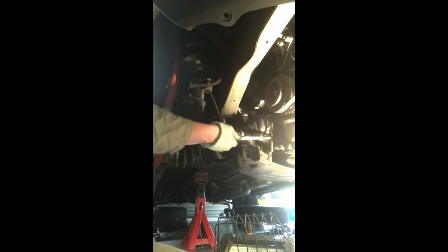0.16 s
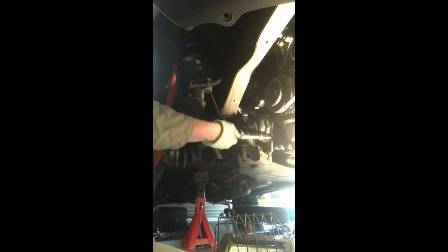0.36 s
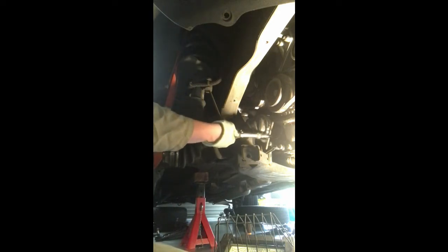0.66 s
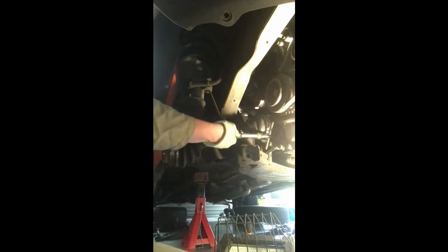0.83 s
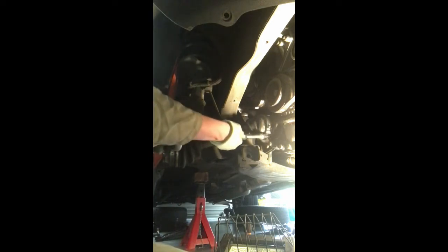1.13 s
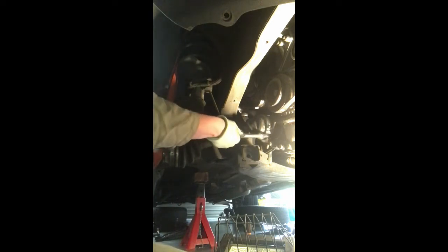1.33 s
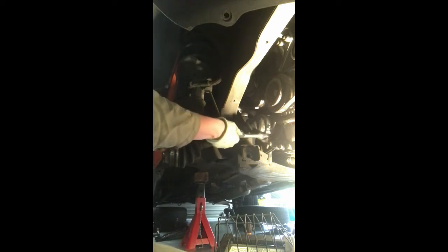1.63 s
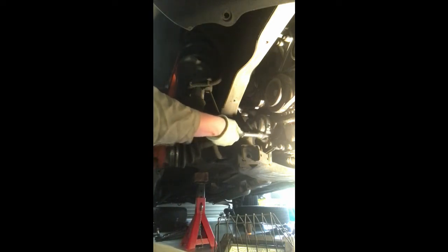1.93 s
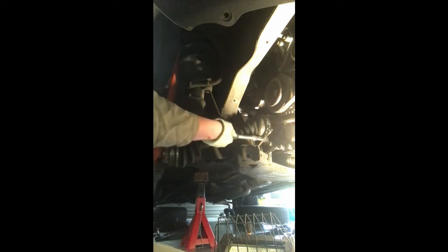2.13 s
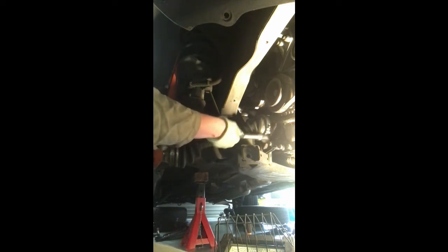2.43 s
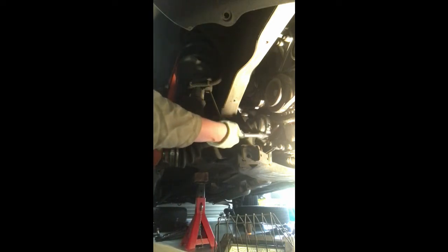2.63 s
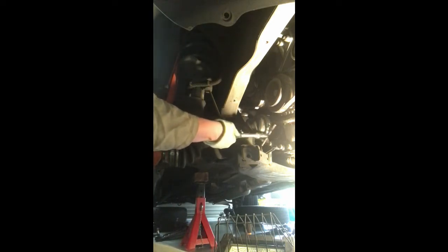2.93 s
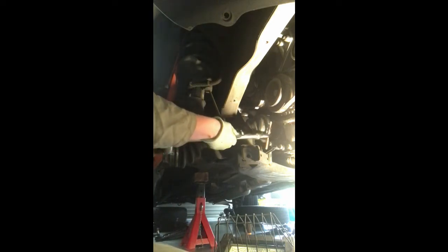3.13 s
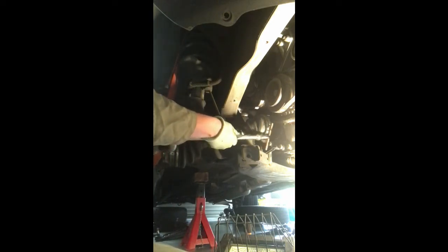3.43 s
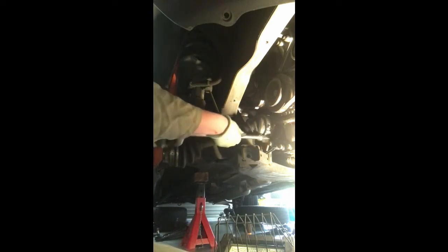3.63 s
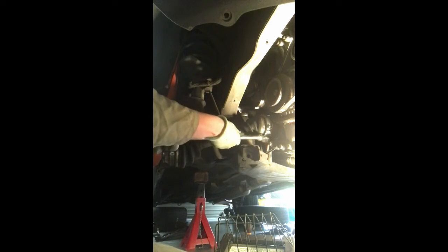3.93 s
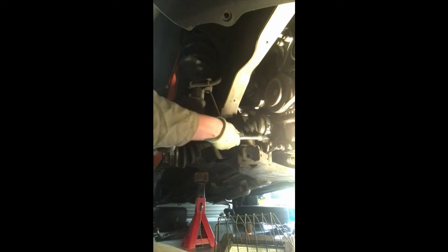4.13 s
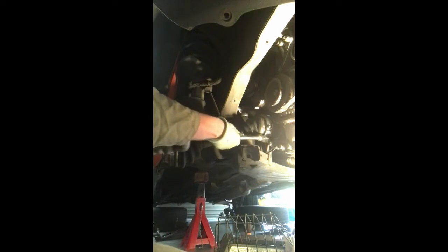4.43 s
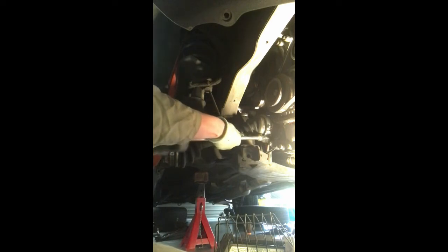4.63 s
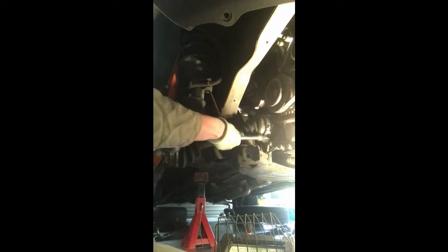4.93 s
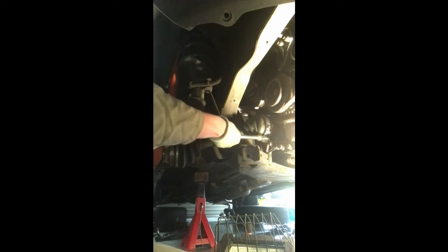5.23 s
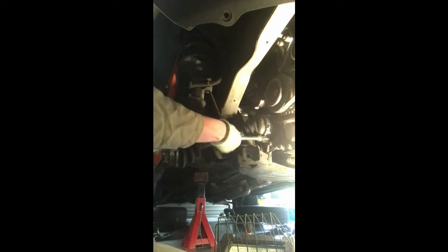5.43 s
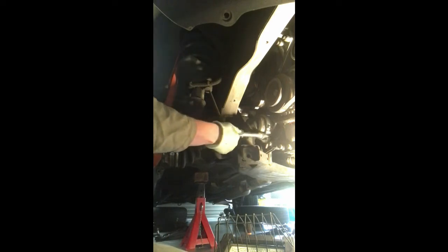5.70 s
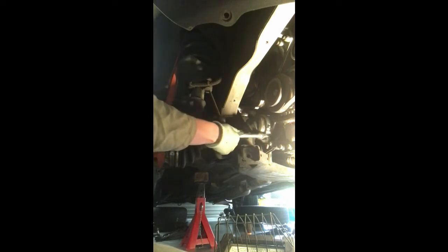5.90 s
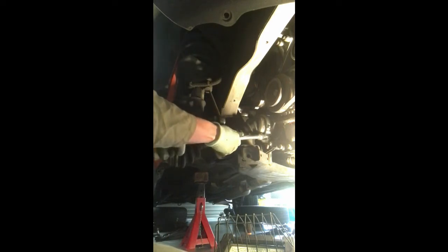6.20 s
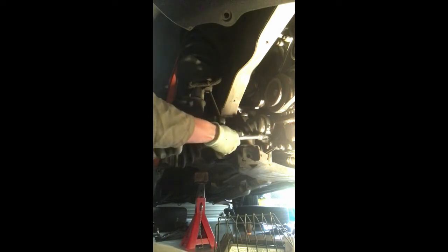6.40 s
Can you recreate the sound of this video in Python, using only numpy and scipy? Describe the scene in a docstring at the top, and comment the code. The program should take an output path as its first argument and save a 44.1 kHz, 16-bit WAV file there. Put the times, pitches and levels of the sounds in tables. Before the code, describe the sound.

Close to a raised car in a quiet garage, a steel weight slides on a shaft and strikes its stop. Uneven clanks, each a brief chatter of contacts with a bright, beating ring, come every half second or so. Short gritty scrapes lead into the blows; light rattles and dull low knocks of the car body follow. The hardest clacks land near two, and around five seconds. Low hum and soft hiss stay underneath.

```python
"""The low hum of a garage, at once a brief scrape and a clank: a steel weight slides along a shaft
under a car and hits its stop. Each blow is a burst of noisy touches that rings the shaft and the car.
The weight sings in pairs of close tones, and dull knocks are low swinging tones with a short rumble.
Between blows, gritty noise makes the scrape and slowly drifting noise makes the hum and hiss."""
import sys
import numpy as np
from scipy import signal
from scipy.fft import rfft, irfft
from scipy.io import wavfile
from scipy.ndimage import uniform_filter1d

SR = 44100
rng = np.random.default_rng(int(sys.argv[2]) if len(sys.argv) > 2 else 0)


def master_out(mix):
    """Clip the mix to full scale and print it as 16-bit PCM to the path in sys.argv[1]."""
    frames = np.transpose(np.atleast_2d(mix))
    ceiling = np.clip(frames, -1, 1)
    pcm = np.round(ceiling * 32767).astype(np.int16)
    wavfile.write(sys.argv[1], SR, pcm)


N = 289296
RING_SAMPLES = 1 << 15  # room for one blow and its ringing

# Blows and rattles, levels relative to each other:
# (time [s], level under 5.5 kHz [dB], level over 5.5 kHz [dB], chatter [s])
BLOW_EVENTS = [(0.0764, -35, -41.5, 0.0089), (0.1099, -36, -48, 0.04), (0.1257, -27.5, -26.5, 0.016),
               (0.4392, -40, -46.5, 0.017), (0.4977, -43.5, -48, 0.027), (0.6478, -46.5, -63, 0.019),
               (0.667, -35.5, -44, 0.0068), (1.0616, -27.5, -33, 0.012), (1.0802, -27, -26, 0.022),
               (1.2974, -31, -37.5, 0.011), (1.688, -33.5, -32.5, 0.0082), (1.959, -60, -68, 0.019),
               (2.0205, -35.5, -41.5, 0.045), (2.0587, -17.5, -12, 0.0077), (2.1276, -43, -33, 0.017),
               (2.438, -56.5, -54, 0.013), (2.4676, -24.5, -21.5, 0.013), (2.486, -29.5, -31.5, 0.0089),
               (2.6622, -44, -64, 0.01), (2.6743, -43, -50, 0.014), (2.9147, -55.5, -74, 0.01),
               (2.964, -60, -72, 0.0034), (3.1595, -61, -80, 0.013), (3.229, -54.5, -86.5, 0.0058),
               (3.2712, -51, -84, 0.003), (3.5166, -46, -54, 0.011), (3.546, -57, -62, 0.0017),
               (3.613, -27.5, -40.5, 0.013), (3.6339, -24, -25.5, 0.01), (3.656, -31.5, -30.5, 0.005),
               (3.7715, -32.5, -33.5, 0.016), (4.0382, -55.5, -78, 0.0051), (4.3689, -46, -55, 0.013),
               (4.3981, -42.5, -51.5, 0.011), (4.4375, -32.5, -36.5, 0.0065), (4.4653, -32, -37, 0.0036),
               (4.5299, -48.5, -56.5, 0.0011), (4.6233, -48.5, -64, 0.0047), (4.6752, -45, -62, 0.068),
               (4.7178, -19, -13, 0.0045), (4.7261, -22.5, -17.5, 0.0043), (5.0365, -31, -43.5, 0.019),
               (5.0513, -41, -47, 0.0073), (5.0717, -33.5, -37, 0.01), (5.1364, -36, -45, 0.0052),
               (5.1936, -34, -38.5, 0.032), (5.2204, -15, -11, 0.0023), (5.2257, -20, -16, 0.0082),
               (5.4969, -41, -49.5, 0.015), (5.5739, -46, -55.5, 0.0051), (5.6318, -39, -54.5, 0.011),
               (5.7732, -51, -67, 0.013), (5.9693, -60, -77.5, 0.013), (6.045, -53.5, -86, 0.0059),
               (6.105, -45.5, -64, 0.01)]
# Bare contact of steel on steel: (frequency [Hz], relative level per Hz [dB])
CONTACT_COLOUR = [(88, -38.5), (150, -4.5), (317, -15), (1330, -9.5), (1690, -1.5), (2310, 1), (2810, 3),
                  (3700, 6.5), (4000, 4), (5700, -4.5), (6050, -1), (8130, -5), (10300, -6), (15300, -11),
                  (16500, -27.5)]
# Resonances of shaft, stop and brackets: (frequency [Hz], width [Hz], level over the bare contact [dB])
SHAFT_RESONANCES = [(631, 68, 15), (1244, 610, 9.5), (1710, 20, -3), (2030, 77, -3.5), (2930, 190, 0.5),
                    (3416, 250, -6), (3946, 91, 1), (4050, 52, 13), (4470, 17, -8.5), (5265, 93, 12.5),
                    (6210, 32, 11.5), (6678, 77, 13.5), (7460, 29, 8.5), (7720, 91, 10.5), (8166, 50, 14),
                    (9283, 110, 8.5), (10300, 24, -1.5), (11520, 120, 11), (13930, 120, 15),
                    (15550, 150, 7)]
# Dense ringing of the car's underside and the garage:
# (band centre [Hz], relative level [dB], time to fall by 60 dB [s])
CAR_BANDS = [(250, -8.5, 0.54), (596, -19, 0.63), (1300, -18, 0.41), (2560, -18, 0.49), (4150, -22, 0.46),
             (7060, -15.5, 0.43), (10500, -17.5, 0.23), (14000, -16, 0.24)]
# The weight starts to ring, mostly at a blow; where it is touched favours one tone:
# (time [s], time until the fade changes [s], level [dB], favoured tone [Hz], fall away from it [dB per octave])
WEIGHT_RINGS = [(0.0777, 0.044, -51.5, 6154, 4), (0.1261, 0.15, -26, 10160, 44),
                (0.4993, 0.08, -49, 11000, 40), (0.6674, 0.073, -56.5, 10400, 20),
                (1.062, 0.2, -39, 6154, 7), (1.085, 0.068, -41, 13515, 5), (1.2985, 0.053, -48, 7300, 29),
                (1.6886, 0.032, -44, 8820, 28.5), (2.0592, 0.039, -36.5, 9590, 41.5),
                (2.128, 0.052, -33.5, 9392, 68), (2.27, 0.058, -37.5, 9392, 75),
                (2.4688, 0.074, -31, 6154, 1), (2.6743, 0.12, -51, 9300, 25),
                (3.6351, 0.25, -31.5, 12200, 1), (3.7728, 0.055, -32.5, 6154, 27.5),
                (3.96, 0.071, -67, 6154, 60), (4.3695, 0.08, -51, 6170, 35),
                (4.4657, 0.087, -54, 12278, 61), (4.7182, 0.03, -45.5, 12278, 17),
                (5.04, 0.07, -49, 6154, 91.5), (5.0714, 0.08, -49, 12278, 61.5),
                (5.1362, 0.06, -54, 7465, 40), (5.194, 0.03, -46, 6154, 60), (5.2205, 0.043, -30, 6200, 18),
                (5.369, 0.14, -46.5, 9392, 80), (5.4979, 0.12, -47.5, 6154, 90)]
# Clear tones of the weight, each with a close twin that makes it beat: (tone [Hz], twin [Hz])
WEIGHT_TONES = [(6154, 6190), (7465, 7440), (9392, 9414), (12278, 12265), (13515, 13550), (14818, 14800)]
# How each tone fades, times are to fall by 60 dB:
# (twin against tone [dB], first fade [s], later fade [s], extra fade of the twin against the tone [s])
WEIGHT_FADES = [(-13, 0.67, 0.19, .3), (-7, 0.36, .2, .3), (-7.5, 0.3, 0.71, .5), (-15.5, 0.37, .3, .3),
                (-5.5, .3, .15, .5), (-10, .6, .25, .3)]
# How readily each tone sings: (relative level [dB])
TONE_LEVELS = [1.37, 0, -0.66, 0.2, -4.5, -4.5]
# Dull knocks of the car body and its brackets: (time [s], level [dB], pitch [Hz])
KNOCKS = [(0.078, -40.5, 599), (0.128, -39.5, 270), (1.067, -35, 665), (1.301, -39, 259), (1.691, -49, 194),
          (2.06, -30.5, 267), (2.127, -32, 218), (2.159, -42, 349), (2.486, -46, 612), (3.615, -32, 611),
          (3.639, -36.5, 588), (3.679, -37.5, 142), (3.774, -39.5, 257), (4.442, -51, 610),
          (4.718, -32.5, 228), (4.733, -35, 336), (5.041, -44.5, 622), (5.223, -37, 770),
          (5.228, -27, 262.5), (5.288, -39, 393), (5.634, -44, 173), (5.66, -42.5, 211.3),
          (5.698, -45.5, 174)]
# The weight dragging along the shaft, levels relative to each other:
# (start [s], end [s], level at start [dB], level at end [dB], treble over 6 kHz against it [dB])
DRAGS = [(.066, .077, -63, -50, -6), (1.28, 1.297, -57, -48, 1), (2.1, 2.2, -43.5, -56.5, -3),
         (0.411, 0.431, -59.5, -44, -3.5), (0.468, 0.548, -47, -59, -6), (1.02, 1.057, -50, -45.5, -7),
         (1.572, 1.685, -57.5, -52, -11), (1.966, 2.025, -50.5, -50.5, -27), (2.03, 2.059, -51, -35, 2),
         (2.278, 2.44, -50, -59, 0), (2.442, 2.464, -39, -48.5, -6), (3.529, 3.568, -53, -55, -8),
         (3.573, 3.61, -53.5, -45.5, 0.5), (4.292, 4.427, -59.5, -45, -10.5), (4.467, 4.59, -54, -59, -17),
         (4.604, 4.727, -74, -41, -1), (4.907, 5.024, -52.5, -40, -5.5), (5.09, 5.2, -68, -49, -6),
         (5.52, 5.62, -57, -59.5, 2.5), (5.663, 5.829, -63, -58.5, -12)]
# Colour of rubbing steel: (frequency [Hz], relative level per Hz [dB])
RUB_COLOUR = [(290, -55), (500, -18.5), (1540, -0.5), (2570, 1), (3990, -0.5), (4420, -13), (6760, -14),
              (9740, -18), (10500, -26.5), (15300, -26), (16500, -55.5)]
# Colour of the quiet garage: (frequency [Hz], relative level per Hz [dB])
GARAGE_COLOUR = [(15, -65), (25, -1), (138, -2), (177, -10.5), (214, -3.5), (313, -11.5), (445, -17),
                 (524, -16.5), (787, -21), (1150, -23), (1280, -23.5), (3410, -29), (9080, -37),
                 (13600, -37.5), (16500, -43.5)]
# Treble hiss over its usual level: (time [s], relative level [dB])
HISS_SWELL = [(0, -1), (1.5, 3.5), (2.85, -4.8), (3.0, 7.5), (3.17, 4), (3.25, 0.3), (6.56, -0.6)]


def blows(spread_db=2.0, dulling=0.91, jamming=0.27, crack_s=0.028, crack_db=-5, level_db=-2.0):
    """A short chatter of contacts drives the crack, the resonances and the dense ringing of the car."""
    t, hz = np.arange(RING_SAMPLES) / SR, np.fft.rfftfreq(RING_SAMPLES, 1 / SR)
    out, bands = np.zeros(N), car_noise()
    treble = 1 / (1 + (5500 / (hz + 1)) ** 6)
    end_fade = np.minimum((RING_SAMPLES / SR - t) / .2, 1)
    for s, low_db, treble_db, chatter_s in BLOW_EVENTS:
        contacts = chatter(t, chatter_s)
        hardness_db = max(treble_db + 25.5, 0)
        car = car_ringing(bands, t, low_db - treble_db, hardness_db)
        # first reflections off the underside
        crack = amp(crack_db) * rng.standard_normal(RING_SAMPLES) * dying(crack_s, t)
        # a hard blow jams the weight against the stop and smothers the shaft's resonances
        place_db = spread_db * rng.standard_normal((len(SHAFT_RESONANCES), 1)) - jamming * hardness_db
        colour_db = read(CONTACT_COLOUR, hz) + resonances(hz, place_db)
        # soft touches lack the top
        colour_db += dulling * (treble_db - low_db) * np.log2(1 + (hz / 9000) ** 4) / 4
        clank = rfft(contacts) * rfft(crack + car) * causal(colour_db)
        for share, db in ((1 - treble, low_db), (treble, treble_db)):
            part = irfft(clank * share, RING_SAMPLES)
            # level is set by the loudest 200 samples near the start
            loudest = np.sqrt(uniform_filter1d(part[:1300] ** 2, size=200).max())
            add(out, s, amp(level_db + db) * part / loudest * end_fade)
    return out


def chatter(t, chatter_s, first_db=-3, uneven_db=3.3):
    """Steel bouncing on steel: a burst of uneven touches, strongest at its start."""
    burst = np.exp(-(t / np.clip(chatter_s, .0005, .06)) ** 3)
    burst *= 1 + 0.38 * np.exp(-t / 0.00078)
    contacts = rng.standard_normal(len(t)) * burst
    contacts *= amp(uneven_db * rng.standard_normal(len(t)))
    contacts /= np.linalg.norm(contacts)
    # a clean blow starts with its hardest touch
    contacts[0] += amp(first_db) * np.exp(-chatter_s / 0.005)
    return contacts


def car_ringing(bands, t, dull_db, hardness_db, car_db=-7.5, per_dull_db=0.13, clatter=0.3):
    """The shaken car rings on in many bands; a dull blow passes more of itself to the car."""
    start = rng.integers(0, N - RING_SAMPLES)
    fade = dying(np.transpose(CAR_BANDS)[2], t) * (1 - np.exp(-t / 0.00054))
    # only the hardest blows shake the small bright parts of the car
    bright_db = clatter * hardness_db * np.linspace(0, 1, len(CAR_BANDS)) ** 3
    shaken = amp(car_db + per_dull_db * min(dull_db, 16) + bright_db)
    return shaken @ (bands[:, start:start + RING_SAMPLES] * fade)


def car_noise():
    """Noise split into the bands of the car's ringing, each at its own level."""
    hz = np.fft.rfftfreq(N, 1 / SR)
    centre, db, _ = np.transpose(CAR_BANDS)
    spectrum = rfft(rng.standard_normal(N))
    bands = []
    for level_db, one in zip(db, np.eye(len(CAR_BANDS))):
        share = np.interp(np.log(hz + 1), np.log(centre), one) ** .5
        bands.append(amp(level_db) * irfft(spectrum * share, N))
    return np.array(bands)


def resonances(hz, place_db):
    """Lift [dB] of the shaft's resonances, each raised or lowered by where the contact lands."""
    f, width, db = np.transpose(SHAFT_RESONANCES)[..., None]
    peaks = amp(db + place_db) / np.hypot(1, 2 * (hz - f) / width) ** 2
    return 20 * np.log10(1 + peaks.sum(0))


def weight(rise_s=0.0027, ping_s=.11, ping_hz=1168, ping_db=-44.5, ping_t60_s=0.53):
    """The steel weight sings in beating pairs until their fading changes, for most tones to a quicker one."""
    t, out = np.arange(SR) / SR, np.zeros(N)
    f, twin = np.transpose(WEIGHT_TONES)[..., None]
    twin_db, _, _, _ = np.transpose(WEIGHT_FADES)[..., None]
    _, first_fade, later_fade, twin_fade = np.transpose(WEIGHT_FADES)
    for s, change_s, db, best_hz, fall_db in WEIGHT_RINGS:
        tones_db = db + np.array(TONE_LEVELS) - abs(fall_db * np.log2(f[:, 0] / best_hz))
        a, b = 2 * np.pi * rng.random((2, len(WEIGHT_FADES), 1))  # starting phases
        tones = np.sin(2 * np.pi * f * t + a)
        tones += amp(twin_db) * dying(twin_fade, t) * np.sin(2 * np.pi * twin * t + b)
        fade = dying(first_fade, np.minimum(t, change_s))
        fade *= dying(later_fade, np.maximum(t - change_s, 0))
        add(out, s, amp(tones_db) @ (tones * fade) * (1 - np.exp(-t / rise_s)))
    # one bracket sings along
    ping = amp(ping_db) * dying(ping_t60_s, t) * np.sin(2 * np.pi * ping_hz * t)
    add(out, ping_s, ping)
    return out


def thuds(t60_s=0.1, rumble_db=-4):
    """A soft low swing of the car body with a short rumble of panels behind it."""
    t, out = np.arange(SR // 2) / SR, np.zeros(N)
    for s, db, hz in KNOCKS:
        band = signal.butter(1, [0.71 * hz, 1.54 * hz], "band", fs=SR)
        panels = signal.lfilter(*band, rng.standard_normal(len(t)))
        swing = np.sin(2 * np.pi * hz * t) * dying(t60_s, t)
        rumble = amp(rumble_db) * evened(panels) * dying(2.3 * t60_s, t)
        add(out, s, amp(db) * (swing + rumble) * (1 - np.exp(-t / 0.0051)))
    return out


def scrape(edge_s=0.013, grit_db=2.0, ring_db=-3, level_db=-4):
    """Rubbing steel: gritty noise, lifted at the resonances of the shaft."""
    t, hz = np.arange(N // 128 + 5) * 128 / SR, np.fft.rfftfreq(512, 1 / SR)
    start, end, start_db, end_db, treble_db = np.transpose(DRAGS)[..., None]
    along = np.clip((t - start) / (end - start), 0, 1)
    # each drag sets in just before its start and stops just after its end
    edges = np.clip(np.minimum(t - start, end - t) / edge_s + 1, 0, 1)
    drag = (edges * amp(start_db + (end_db - start_db) * along)) ** 2
    treble_drag = drag * amp(treble_db) ** 2
    colour = amp(read(RUB_COLOUR, hz) + resonances(hz, ring_db))[:, None] ** 2
    treble = 1 / (1 + (6000 / (hz[:, None] + 1)) ** 6)
    low, high = colour * (1 - treble), colour * treble
    power = low / low.sum() * drag.sum(0) + high / high.sum() * treble_drag.sum(0)
    grit = grit_db * rng.standard_normal(len(t))
    return shaped(10 * np.log10(power + 1e-20) + level_db + grit, size=512)


def air(air_db=-60, patchy_db=3.0, hiss_hz=6000, steady_hz=400):
    """Far hum and hiss are noise with slowly drifting patches; the hum is steadier."""
    t, hz = np.arange(N // 512 + 5) * 512 / SR, np.fft.rfftfreq(2048, 1 / SR)[:, None]
    patches = rng.standard_normal((len(hz), len(t)))
    patches = uniform_filter1d(patches, size=20, axis=0)  # smooth over pitch
    patches = evened(uniform_filter1d(patches, size=8, axis=1))  # smooth over time
    patches_db = patchy_db * patches * np.clip(hz / steady_hz, 0, 1)
    hissy = 1 - 1 / (1 + (hz / hiss_hz) ** 2)
    swell_db = hissy * np.interp(t, *np.transpose(HISS_SWELL))
    noise = shaped(read(GARAGE_COLOUR, hz) + patches_db + swell_db, size=2048)
    return amp(air_db) * evened(noise)


def amp(db):
    """Turns decibels into a plain gain."""
    return 10 ** (np.asarray(db) / 20)


def evened(x):
    """Scales a sound to an average (RMS) level of one."""
    return x / np.sqrt(np.mean(x ** 2) + 1e-20)


def add(mix, s, sound):
    """Lays a sound into the mix at a time in seconds, cut off at the end of the mix."""
    part = mix[round(s * SR):][:len(sound)]
    part += sound[:len(part)]


def read(points, hz):
    """Reads a colour table at any frequency, with straight lines over log frequency."""
    f, value = np.transpose(points)
    return np.interp(np.log(hz + 1), np.log(f + 1), value)


def causal(db):
    """Turns dB per frequency bin into a filter response that starts at its excitation."""
    log_gain = np.log(amp(np.maximum(db, -100)))
    mirrored = np.r_[log_gain, log_gain[-2:0:-1]]
    phase = -signal.hilbert(mirrored).imag[:len(db)]
    return np.exp(log_gain + 1j * phase)


def dying(t60, t):
    """Fading of a ringing body: it falls by 60 dB in t60 seconds."""
    return amp(-60 * t / np.clip(t60, .005, 5)[..., None])


def shaped(db, size):
    """Noise from random short-time spectra, db given as frequency bins by time frames."""
    a, b = rng.standard_normal((2,) + db.shape)
    spectra = (a + 1j * b) * amp(db)
    return signal.istft(spectra, nperseg=size, noverlap=size * 3 // 4)[1][:N]


def scene():
    """All layers together, as one channel."""
    return (blows() + weight() + thuds() + scrape() + air())[None]


def record(dry, treble_dim_hz=15800, edge_hz=16963):
    """The deepest bass is cut, treble is dimmed above 15.8 kHz and ends near 17 kHz."""
    dry = signal.sosfilt(signal.butter(6, 48, "high", fs=SR, output="sos"), dry)
    low = signal.oaconvolve(dry, signal.firwin(255, treble_dim_hz, fs=SR)[None], "same")
    dimmed = low + amp(-17) * (dry - low)
    band_limit = signal.firwin(511, edge_hz, window=("kaiser", 9), fs=SR)
    return signal.oaconvolve(dimmed, band_limit[None], "same")


dry = scene()
out = record(dry)
master_out(out)
```